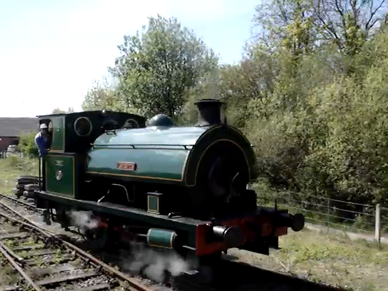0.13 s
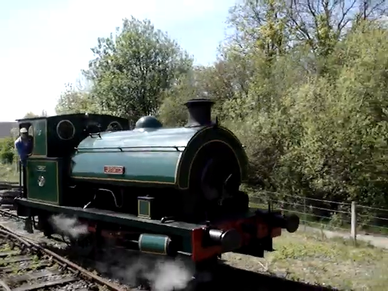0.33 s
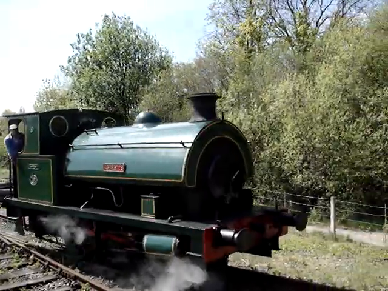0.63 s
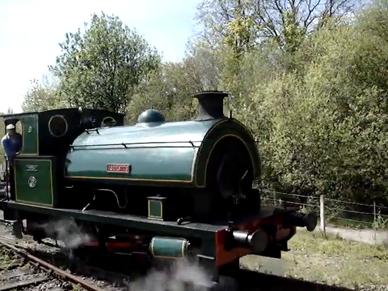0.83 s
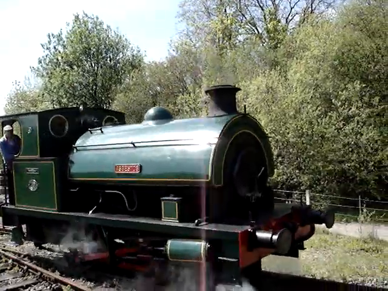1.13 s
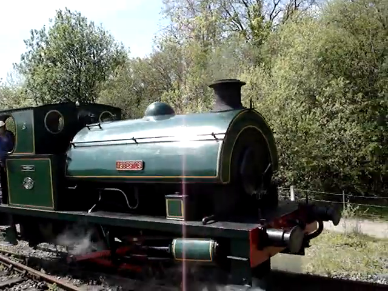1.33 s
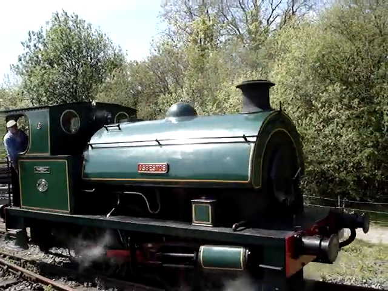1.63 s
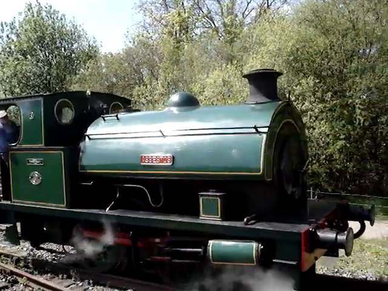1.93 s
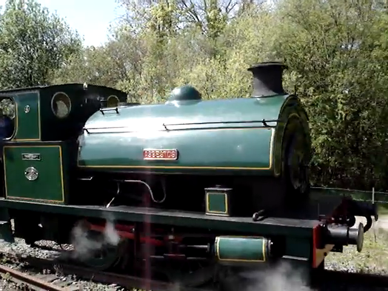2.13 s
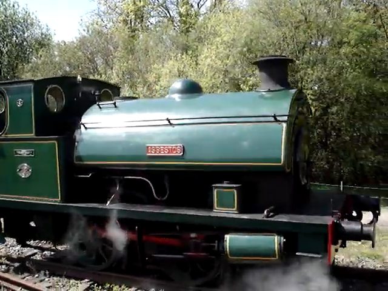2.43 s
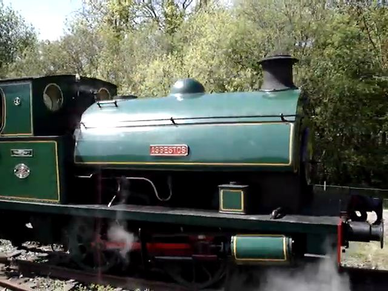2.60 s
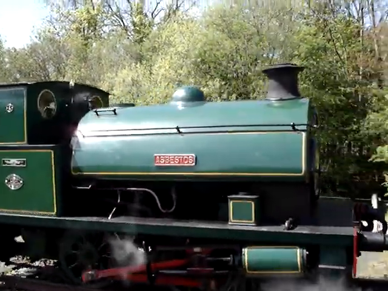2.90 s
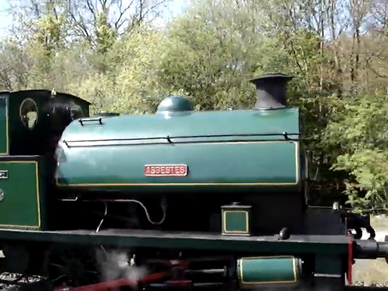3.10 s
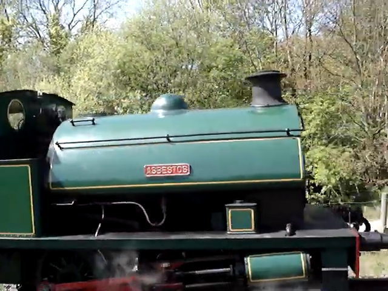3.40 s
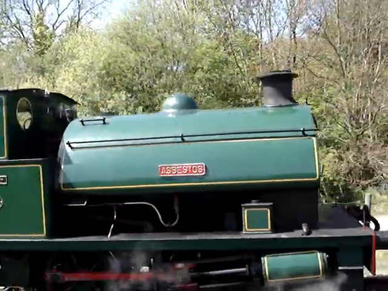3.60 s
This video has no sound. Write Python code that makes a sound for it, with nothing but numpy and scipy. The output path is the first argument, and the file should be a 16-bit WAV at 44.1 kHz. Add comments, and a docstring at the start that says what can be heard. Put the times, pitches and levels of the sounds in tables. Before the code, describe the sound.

A small steam locomotive rolls slowly, close by outdoors, its steam hissing loudly throughout, surging, sputtering and briefly half whistling. Underneath are a low boiler drone and wheel rumble. Metal rods knock at about 0.1, 1.1 and 1.8 seconds, and steel squeals faintly during the first two seconds. From about 2.7 seconds the knocks come more often, and the drone swells around 3.5 seconds.

```python
"""A small steam locomotive rolls slowly, close by, in the open.
From the start, steam sputters out of its drains and leaky seals in a loud, surging hiss that now and
then half whistles. Under it the boiler drones and the wheels rumble on the rails. In the first two
seconds the rods knock a few times in their bearings and rubbing steel squeals faintly.
In the last second the knocks come more often and the drone swells."""
import sys
import numpy as np
from scipy import signal
from scipy.fft import rfft, irfft
from scipy.io import wavfile

SR = 44100
rng = np.random.default_rng(int(sys.argv[2]) if len(sys.argv) > 2 else 0)


def int16_out(signal):
    """Quantize to a 16-bit WAV file."""
    q = np.round(np.clip(np.atleast_2d(signal).T, -1, 1) * 32767)
    wavfile.write(sys.argv[1], SR, q.astype(np.int16))


N = 165375  # 3.75 seconds
T = np.arange(N) / SR  # the time of each sample, in seconds
HZ = np.maximum(np.arange(N // 2 + 1) * SR / N, 1)  # the pitch of each point in a spectrum
CUTOFF_HZ = 10120  # the sound is cut off above this pitch


def from_db(db):
    """Turn decibels into a number to multiply a sound by."""
    return 10 ** (np.asarray(db) / 20)


def rms_one(x):
    """Scale a signal so that its average strength (rms) is 1."""
    return x / np.sqrt(np.mean(x ** 2) + 1e-20)


def in_time(rows):
    """Join (time_s, value) points with straight lines, giving a value for every sample."""
    return np.interp(T, *np.transpose(rows))


def swing(rows):
    """How many decibels a level curve lies above or below its own average."""
    db = in_time(rows)
    return db - db.mean()


def drift(rate_hz):
    """A smooth random wobble of about size 1; a higher rate wobbles faster."""
    step, warm_up = 40, 2000  # one random value every 40 samples; the first 2000 are skipped
    memory = np.exp(-2 * np.pi * step * rate_hz / SR)
    noise = rng.standard_normal(N // step + warm_up + 2)
    slow = signal.lfilter([1], [1, -2 * memory, memory * memory], noise)[warm_up:]
    return np.interp(np.arange(N) / step, np.arange(len(slow)), rms_one(slow))


def narrow_noise(pitch_hz, width_hz):
    """Noise kept close to one pitch, so it sounds like a breathy, wavering tone."""
    resonance = 1 + (2 * (HZ - pitch_hz) / width_hz) ** 2
    return rms_one(irfft(rfft(rng.standard_normal(N)) / resonance, N))


def butter(x, hz, kind, order=2):
    """Keep the part of a sound below hz ("low") or above it ("high")."""
    return signal.sosfilt(signal.butter(order, min(hz, SR / 2 - 1), kind, fs=SR, output="sos"), x + 1e-18)


def turbulence(spectrum, levels, swirl_db, band_count):
    """Bands of noise that each waver on their own and follow the nearest (pitch_hz, level curve) pairs."""
    hz, db = np.transpose(spectrum)
    colour = from_db(np.interp(np.log(HZ), np.log(hz), db))
    colour /= np.sqrt(1 + (hz[0] / HZ) ** 4)  # fade out below the lowest listed pitch
    colour = rms_one(colour * (HZ < CUTOFF_HZ + 60))
    centres = np.geomspace(hz[0], hz[-1], band_count)
    band_position = np.interp(np.log(HZ), np.log(centres), np.arange(band_count))
    white = rfft(rng.standard_normal((2, N)))  # two noises, so neighbouring bands differ
    anchors = np.log([pitch_hz for pitch_hz, _ in levels])
    curves = np.array([curve for _, curve in levels])
    out = 0
    for k, centre in enumerate(centres):
        window = np.sqrt(np.maximum(1 - abs(band_position - k), 0))
        band = irfft(white[k % 2] * colour * window, N)
        shares = np.array([np.interp(np.log(centre), anchors, row) for row in np.eye(len(levels))])
        out = out + band * from_db(shares @ curves + swirl_db * drift(rate_hz=16))
    return out


def squeals():
    """Steel rubs on steel: each faint squeal is one shaky tone that swells, slides and fades."""
    # The squeals: start_s, length_s, first_hz, last_hz, level_db
    rubs = [(0.141, .1, 1180, 1280, -40), (0.678, 0.19, 855, 826, -43), (0.798, 0.246, 844, 770, -47.5),
            (1.562, .13, 575, 598, -40.5), (1.64, .14, 1378, 1290, -44), (1.812, 0.069, 1200, 1150, -36),
            (1.929, 0.066, 1240, 1193, -40)]
    shake_hz, flutter_db = 20.3, 4
    out = 0
    for start_s, length_s, first_hz, last_hz, level_db in rubs:
        progress = np.clip((T - start_s) / length_s, 0, 1)
        pitch_hz = first_hz + (last_hz - first_hz) * progress + shake_hz * drift(rate_hz=40)
        tone = np.sin(2 * np.pi * np.cumsum(pitch_hz) / SR)
        swell = np.sqrt(2 * abs(np.sin(np.pi * progress)))
        out = out + from_db(level_db + flutter_db * drift(rate_hz=25)) * swell * tone
    return out


def boiler():
    """Air drawn through the boiler keeps one low note droning unevenly."""
    # How loud the drone is: time_s, level_db
    loudness = [(0.0, -41), (0.04, -35.5), (0.28, -50.5), (1.01, -38.5), (1.28, -48), (1.3, -41),
                (1.49, -53), (1.52, -38), (2.3, -48), (3.23, -40.5), (3.25, -50), (3.49, -31), (3.72, -43),
                (3.75, -37)]
    tone = narrow_noise(pitch_hz=184.1, width_hz=28)
    strength = abs(signal.hilbert(tone))
    steadier = rms_one(tone / (strength + .1) ** 0.29)  # partly even out the random swells
    return steadier * from_db(in_time(loudness))


def wheels():
    """The wheels rumble as they roll on the rails."""
    # The balance of low and high in the rumble: pitch_hz, relative_db
    colour = [(20, -16.5), (50, -15), (80, -16), (100, -13.5), (135, -4), (170, -2), (260, 4), (370, -3.5),
              (550, -1), (850, -5), (1300, -7.5), (2000, -23)]
    # How the deep bass rises and falls: time_s, relative_db
    bass = [(0, -58), (.5, -64.5), (1.03, -59), (1.13, -53), (1.34, -54.5), (1.44, -49), (1.62, -54.5),
            (1.82, -53.5), (2.1, -61), (2.4, -60.5), (2.65, -55), (2.87, -62.5), (3.2, -61.5), (3.5, -59.5),
            (3.75, -47)]
    # How the rest of the rumble rises and falls: time_s, relative_db
    rolling = [(0.0, -36), (0.12, -40), (0.15, -42), (0.33, -46), (1.63, -38), (1.66, -44), (1.83, -35),
               (1.85, -41), (2.34, -46), (2.64, -39), (2.8, -43), (2.85, -42.5), (3.65, -39), (3.75, -39)]
    levels = [(90, swing(bass)), (180, swing(rolling))]
    return from_db(-38.5) * turbulence(colour, levels, swirl_db=1.5, band_count=16)


def knocks():
    """Rods knock in loose bearings: metal rings over a short clatter, some knocks duller, some brighter."""
    # The knocks, with their levels before dulling: start_s, level_db, brightness_hz
    hits = [(.105, -21.5, 1000), (.114, -35, 1040), (1.064, -28.5, 900), (1.092, -33, 1010),
            (1.586, -42, 700), (1.817, -35, 1310), (2.66, -37, 1100), (2.919, -29.5, 910),
            (3.067, -27.5, 855), (3.091, -32, 800), (3.447, -29.5, 960), (3.632, -28, 1600),
            (3.712, -20, 1980), (3.731, -28, 1590)]
    # The notes the rods and frame ring with: pitch_hz, relative_db, fade_s (time to drop 60 dB)
    notes = [(474, -14, 0.079), (593, -0.5, .08), (645, -4.5, 0.073), (725, -2, .07), (812, -4, .07),
             (980, -10, 0.088), (1190, -11, .1), (1497, 1, 0.085), (1660, -16, .07)]
    ring_db, clatter_db, clatter_fade_s = -4, -2.5, 0.12
    out = np.zeros(N + SR)
    t = T[:SR // 2]
    for start_s, level_db, brightness_hz in hits:
        ring = 0
        for pitch_hz, note_db, fade_s in notes:  # each hit gets its own random mix of the notes
            sign = rng.choice([-1, 1])
            fade = from_db(note_db + rng.normal(0, 4.3) - 60 * t / fade_s)
            ring = ring + sign * fade * np.sin(2 * np.pi * pitch_hz * t)
        noise = butter(rng.standard_normal(len(t)), 400, "high")
        clatter = rms_one(butter(noise, brightness_hz, "low"))
        knock = from_db(ring_db) * ring + from_db(clatter_db - 60 * t / clatter_fade_s) * clatter
        start = int(start_s * SR)
        out[start:start + len(t)] += from_db(level_db) * butter(knock, brightness_hz, "low", order=4)
    return out[:N]


def whistles():
    """For a moment a steam jet catches a natural note of its opening and half whistles."""
    # The whistles: middle_s, length_s, pitch_hz, width_hz, level_db
    notes = [(0.15, 0.099, 2520, 150, -27), (.29, 0.25, 4660, 450, -26.5), (0.49, 0.18, 2860, 140, -33),
             (0.807, .11, 3180, 170, -29), (0.863, 0.064, 3370, 161, -23.5), (0.853, .1, 4300, 350, -28),
             (1.045, 0.31, 2780, 150, -30.5), (1.412, .06, 2650, 150, -30), (1.632, 0.074, 3370, 150, -26),
             (2.0, 0.33, 2280, 170, -33), (2.72, 0.034, 3940, 400, -25), (3.115, .16, 4250, 350, -26),
             (3.175, 0.33, 3660, 200, -27), (3.285, .05, 2730, 140, -28), (3.66, .08, 4900, 300, -25)]
    out = 0
    for middle_s, length_s, pitch_hz, width_hz, level_db in notes:
        swell = np.exp(-(2 * (T - middle_s) / length_s) ** 2)
        out = out + from_db(level_db) * swell * narrow_noise(pitch_hz, width_hz)
    return out


def steam():
    """The jets hiss, surging with the flow of steam and sputtering as water passes through them."""
    # The balance of low and high in the hiss: pitch_hz, relative_db
    colour = [(500, -28), (1000, -17), (1600, -13.5), (1720, -9.5), (1860, -3), (2080, -6.5), (2500, -1.2),
              (2850, -0.14), (3700, 0.4), (5000, -1.5), (6200, -4), (7100, -9), (8400, -11.5),
              (10000, -18.5)]
    # How five parts of the hiss surge, from lowest to highest: time_s, relative_db
    low = [(0.0, -24.5), (0.01, -28.5), (0.11, -27), (0.42, -33), (0.44, -30.5), (0.7, -30), (0.71, -28.5),
           (0.73, -33.5), (1.77, -30.5), (2.13, -31), (2.21, -34), (2.27, -31.5), (2.58, -32.5),
           (2.81, -31.5), (3.4, -33.5), (3.47, -28), (3.53, -32), (3.75, -27)]
    middle = [(0.0, -26), (0.11, -24.5), (0.71, -25), (0.85, -25), (0.94, -27.5), (1.16, -26), (1.38, -26),
              (1.41, -21), (1.42, -26.5), (1.64, -22.5), (1.71, -25.5), (2.4, -24.5), (2.66, -28),
              (2.67, -36), (2.71, -23), (2.73, -23), (2.88, -26.5), (2.89, -24), (3.51, -25.5),
              (3.6, -30.5), (3.61, -26), (3.75, -27.5)]
    upper = [(0.0, -24.5), (0.29, -24), (0.76, -27.5), (0.81, -23), (1.04, -27), (1.27, -25.5), (1.32, -25),
             (1.36, -26.5), (1.65, -24), (1.73, -27.5), (1.83, -24.5), (2.59, -27), (2.74, -23.5),
             (2.76, -24.5), (3.17, -23), (3.36, -28.5), (3.52, -22), (3.58, -27.5), (3.65, -22.5),
             (3.75, -24.5)]
    treble = [(0.0, -27.5), (0.25, -24.5), (0.44, -26), (0.46, -30), (0.57, -24), (0.6, -27.5), (0.88, -26),
              (1.09, -31.5), (1.1, -26.5), (1.39, -29), (1.64, -24.5), (1.87, -27.5), (2.4, -25.5),
              (2.45, -29.5), (2.64, -26), (3.48, -24), (3.58, -28), (3.75, -23)]
    top = [(0.0, -33), (0.01, -34), (0.38, -32.5), (0.57, -36), (1.26, -33.5), (1.48, -36), (2.31, -33.5),
           (2.52, -38), (2.71, -34.5), (3.65, -37.5), (3.68, -35), (3.75, -34)]
    surge_share = 0.87  # how much of each curve's rise and fall reaches the hiss
    level_db, sputter_db = -20, 0.39
    curves_by_hz = [(2300, low), (2700, middle), (3300, middle), (3700, upper), (4800, upper),
                    (5300, treble), (6500, treble), (7800, top)]
    levels = [(pitch_hz, surge_share * swing(curve)) for pitch_hz, curve in curves_by_hz]
    hiss = turbulence(colour, levels, swirl_db=0.97, band_count=30)
    return hiss * from_db(level_db + sputter_db * drift(rate_hz=25))


def scene():
    """The whole engine is heard straight ahead, the same in both ears."""
    engine = steam() + whistles() + boiler() + wheels() + knocks() + squeals()
    return np.array([engine, engine])


def record(dry):
    """Cut away the very highest treble steeply."""
    treble_cut = signal.ellip(12, .02, 70, CUTOFF_HZ, fs=SR, output="sos")
    return signal.sosfiltfilt(treble_cut, dry)


dry = scene()
out = record(dry)
int16_out(out)
```